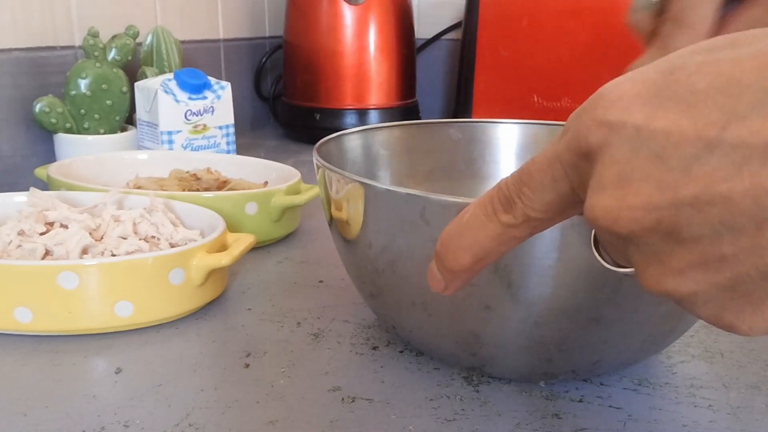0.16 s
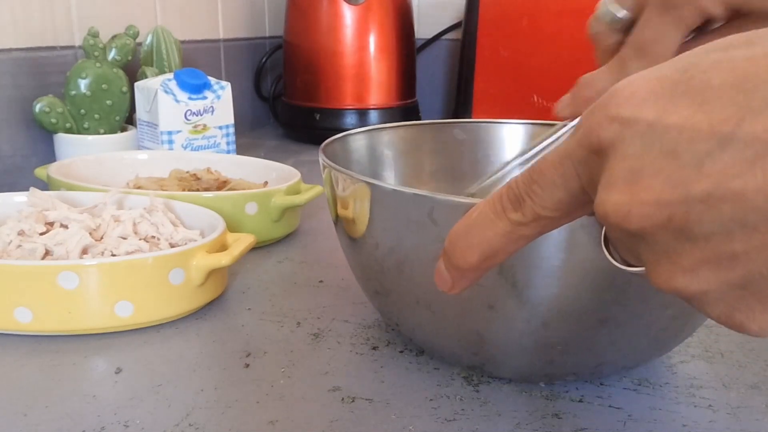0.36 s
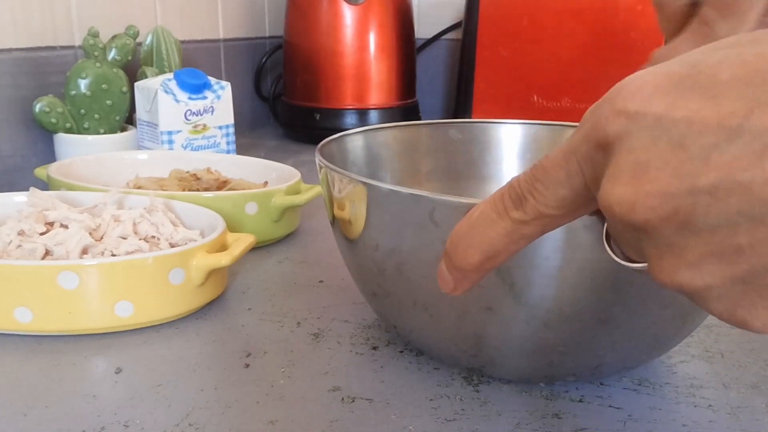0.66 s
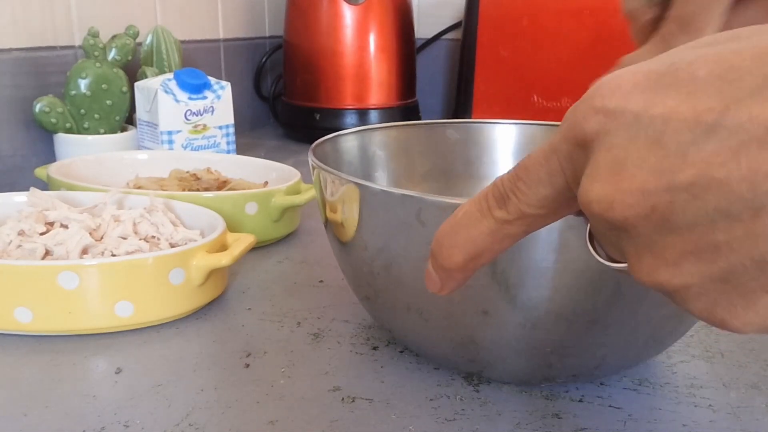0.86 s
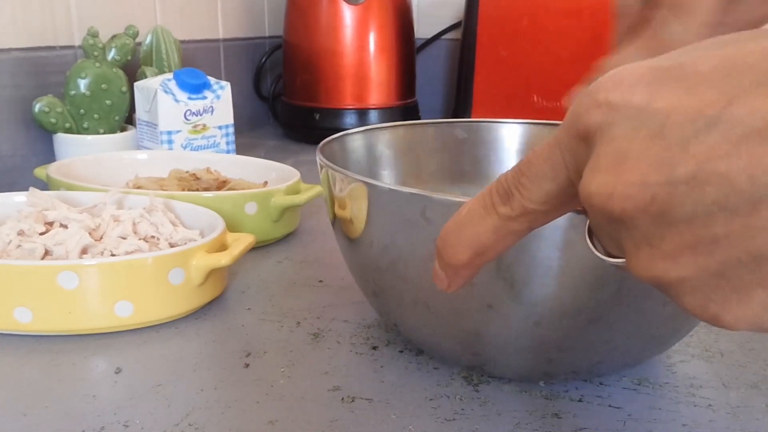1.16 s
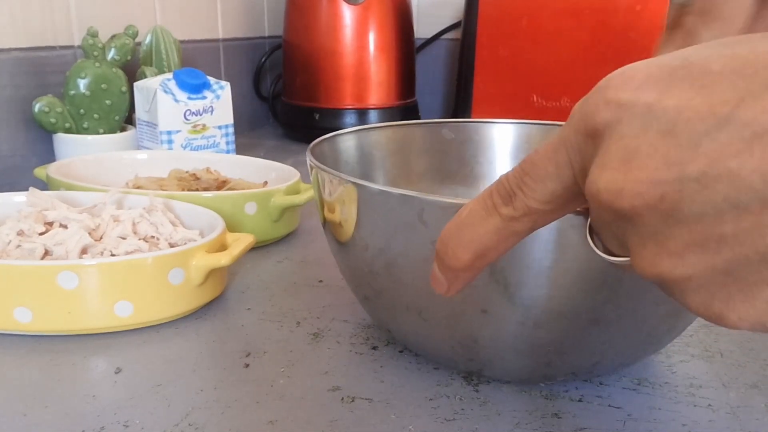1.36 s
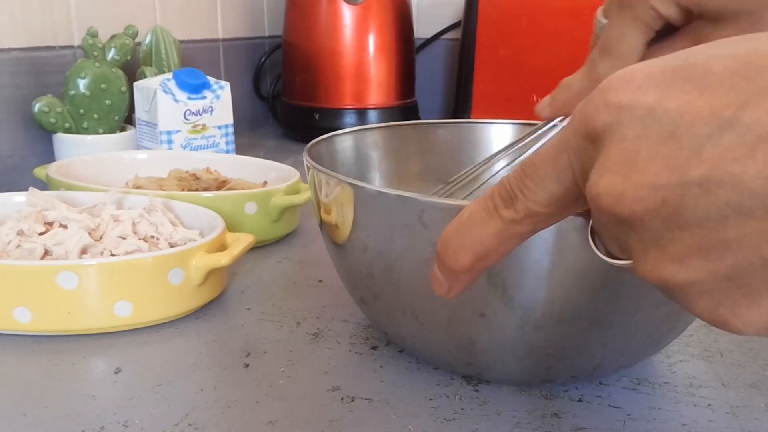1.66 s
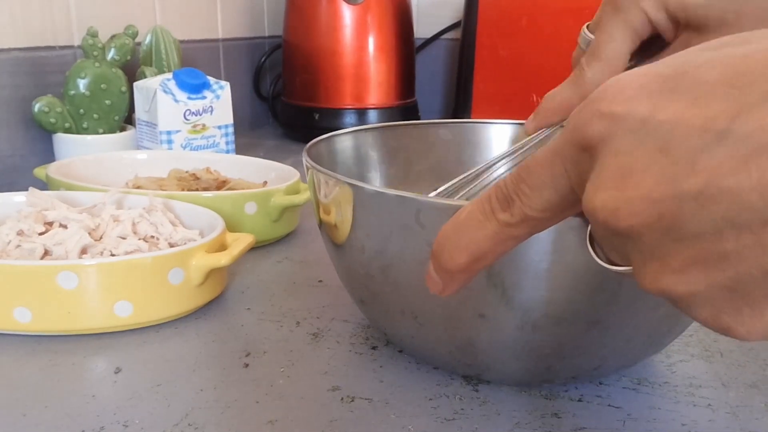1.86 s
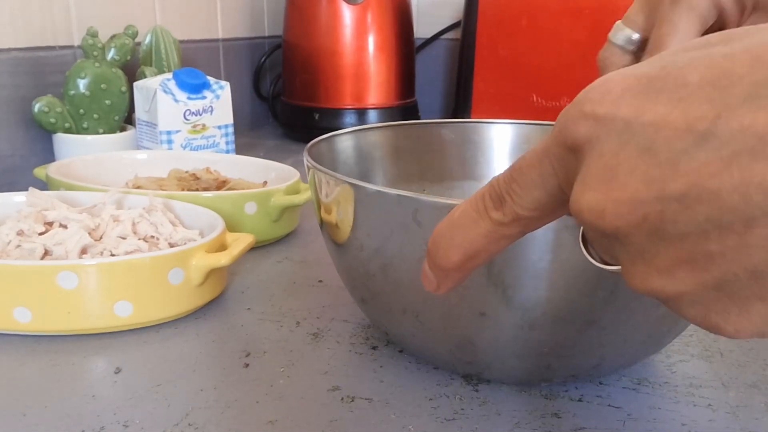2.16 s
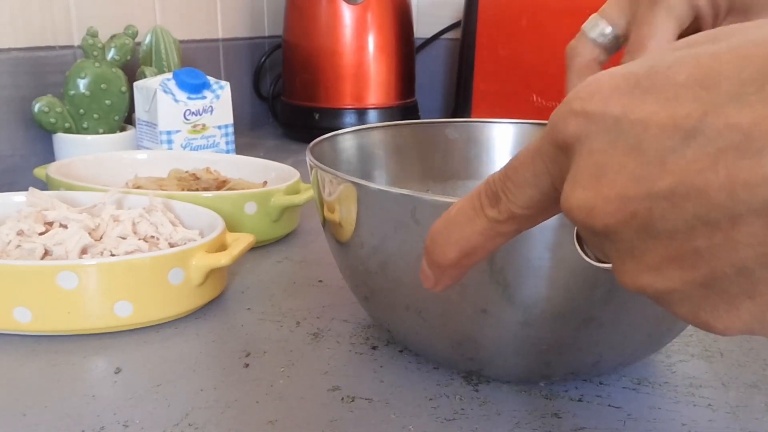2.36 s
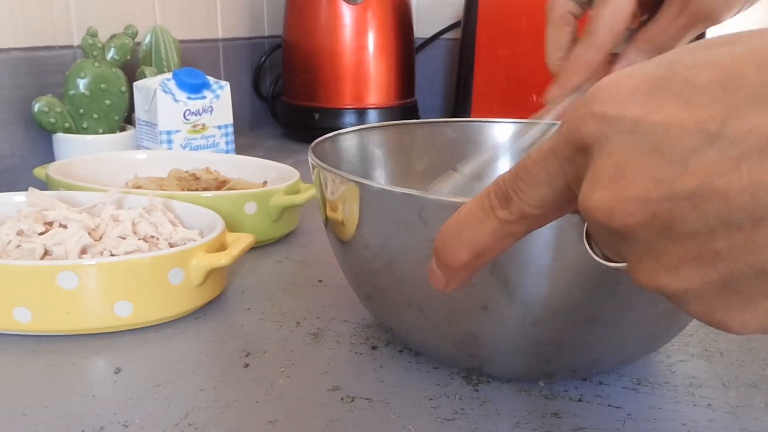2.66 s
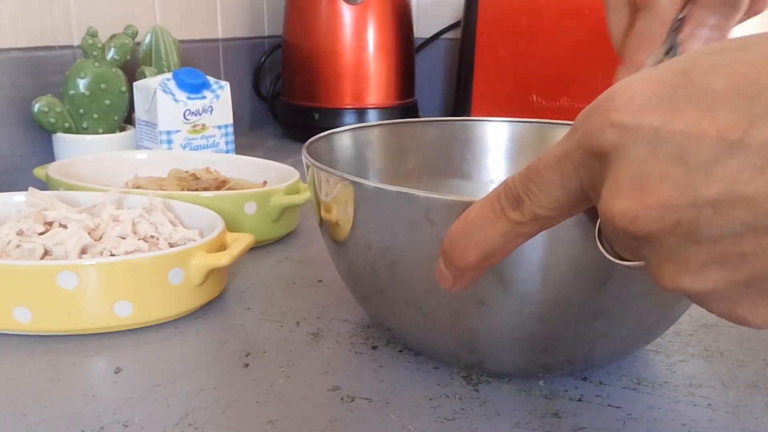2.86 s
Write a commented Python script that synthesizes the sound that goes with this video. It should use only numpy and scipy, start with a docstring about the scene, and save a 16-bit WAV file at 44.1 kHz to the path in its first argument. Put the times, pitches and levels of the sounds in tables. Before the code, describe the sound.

A wire whisk beats eggs briskly in a steel bowl, ticking, sloshing, ending in harder clanks

```python
"""A wire whisk beats eggs in a steel bowl on a kitchen counter, nearly five strokes a second, heard close.
The wires chatter, tick and squeak on the wall: noise bursts, filtered clicks and wavering sines.
Egg slaps ring the bowl's modes; flow through the wires is flickering noise, popping films and bubble pings.
The last four strokes hit bare steel much harder; a small kitchen rings briefly behind, over quiet air.
The stereo microphone feed has its deep bass cut, its peaks limited and its top cut steeply."""
import sys
import numpy as np
from scipy import signal
from scipy.fft import rfft, irfft, next_fast_len
from scipy.io import wavfile
from scipy.ndimage import uniform_filter1d, minimum_filter1d

SR = 44100
rng = np.random.default_rng(int(sys.argv[2]) if len(sys.argv) > 2 else 0)


def to_wav(sig):
    """Store sig (one row per channel, or 1-D mono) as 16-bit WAV at the path in sys.argv[1].

    Samples outside -1..1 are clipped; the rate is SR.
    """
    pcm = np.clip(np.atleast_2d(sig), -1, 1) * 32767
    pcm = np.round(pcm).astype(np.int16)
    wavfile.write(sys.argv[1], SR, pcm.T)  # frames by channels


N = 132300

# Wires chattering on the bowl: start_s, level_db, hold_s, pitch_hz, resonance_db
WIRE_CONTACTS = [(0.2418, -28.5, 0.005, 6370, -3), (0.2498, -21, 0.002, 6440, 1),
                 (0.49, -26, 0.0049, 5030, 9.5), (0.557, -31.5, 0.0023, 5130, 8),
                 (0.739, -26, 0.0048, 5400, 9), (0.781, -33, 0.0019, 4700, 5),
                 (0.818, -32, 0.0057, 4300, 11), (0.857, -30.5, .0015, 5470, 15),
                 (0.958, -25, 0.005, 4570, 10.5), (1.178, -25, 0.0013, 5270, 10),
                 (1.1815, -20.5, 0.0048, 4630, 12), (1.3996, -18, 0.001, 5400, 10.5),
                 (1.62, -28, 0.0091, 4330, 10.5), (1.818, -28.5, 0.0016, 5900, 22),
                 (1.905, -33, 0.0026, 5430, -10), (1.944, -20, 0.0016, 3580, 24),
                 (1.953, -29, 0.00092, 2340, 22), (2.132, -36.5, 0.0023, 3350, 7),
                 (2.269, -34.5, 0.0039, 4800, 12), (2.3374, -19.5, 0.002, 5350, 34.5),
                 (2.340, -13.5, 0.00099, 6950, 28), (2.351, -24, 0.02, 6800, 0.5),
                 (2.544, -24, 0.0036, 8500, 14), (2.55, -25.5, 0.0039, 7500, 0),
                 (2.559, -27.5, 0.006, 5670, -16.5), (2.67, -36, 0.008, 5100, 17),
                 (2.738, -14.5, 0.013, 7800, 10), (2.7427, -11, 0.0008, 6760, 14.5),
                 (2.747, -19.5, 0.01, 6550, 11), (2.868, -32, 0.0052, 6800, 3.5),
                 (2.958, -10.5, 0.0018, 6100, 14.5), (2.963, -11.5, 0.0027, 6430, 15),
                 (2.964, -18, 0.0039, 5500, 27), (2.971, -27.5, 0.029, 5400, 28)]
# Single wires ticking on the wall: start_s, peak_db
WIRE_SNAPS = [(0.247, -17), (0.2492, -8), (0.4945, -16), (.7392, -10), (0.7782, -13), (0.82, -16.5),
              (0.859, -20), (0.9565, -7.5), (1.178, -12), (1.24, -18), (1.264, -18), (1.325, -21),
              (1.3992, -10.5), (1.62, -7), (1.8171, -13.5), (1.837, -31), (1.903, -15.5), (1.946, -11.5),
              (2.959, -4.5)]
# Egg slapping the wall: start_s, level_db, hold_s, pitch_hz, bowl_ring_db
EGG_SLAPS = [(0.113, -54, 0.029, 487, -64), (0.244, -42, 0.017, 615, -44.5),
             (0.359, -51.5, 0.012, 915, -51), (0.491, -39, 0.0082, 603, -56),
             (0.609, -48, 0.015, 402, -51.5), (0.7355, -31.5, 0.0084, 2030, -43),
             (0.819, -36, 0.015, 1090, -42.5), (0.957, -39.5, 0.015, 593, -52),
             (1.045, -40.5, 0.0057, 920, -65), (1.178, -34.5, 0.014, 1160, -54),
             (1.265, -34.5, 0.011, 1180, -45), (1.399, -33, 0.0077, 1230, -44.5),
             (1.45, -43, 0.016, 1100, -44.5), (1.621, -36, 0.018, 580, -48),
             (1.817, -33, 0.0038, 910, -42.5), (1.952, -36, 0.0033, 1320, -48),
             (2.15, -42, 0.0052, 686, -51), (2.36, -22, 0.01, 1160, -35),
             (2.564, -23.5, 0.0023, 790, -39.5), (2.741, -31, 0.0087, 1880, -37.5),
             (2.955, -31, 0.011, 2220, -43.5)]
# High ringing of rim and wires: pitch_hz, resonance_db, t60_s
STEEL_MODES = [(2570, 7, 0.32), (2865, 11.5, 0.06), (3040, 12, 0.12), (5200, -6, 0.11), (5670, -2, 0.087),
               (6350, 5, 0.15), (6300, -20, 0.12), (6840, 10, 0.013), (6970, 1, 0.042), (7100, 8, 0.11),
               (8700, 11, 0.26), (7660, -7, 0.12), (9500, 7, 0.054)]
# Low modes of the bare bowl wall: pitch_hz, level_db, t60_s
WALL_MODES = [(243.6, -13.5, 0.14), (365, -14, .14), (437, -6.5, 0.16), (487, -6.5, 0.13),
              (768.3, -8, 0.22), (856, -3, 0.15), (1144, -11, .17), (1452, -3, 0.19), (1573, -7, 0.2),
              (1672, -4.5, 0.09), (1970, -15.5, 0.13), (2196, 1, 0.13)]
# Wires squeaking on wet steel: start_s, level_db, length_s, pitch_hz
WIRE_SQUEAKS = [(0.051, -40.5, 0.024, 2486), (0.147, -39.5, 0.048, 2490), (0.398, -40.5, .028, 3200),
                (.549, -30.5, 0.015, 4600), (.601, -33.5, 0.015, 3550), (0.916, -34, 0.012, 2770)]
# Wires sweeping through the egg: fastest_s, level_db, rise_s, fall_s, treble_tilt_db_per_octave
EGG_SWISHES = [(.08, -36.5, 0.039, 0.083, 4.5), (0.351, -36, 0.084, 0.062, 4.5),
               (.485, -37.5, 0.025, 0.02, 2), (.56, -37, 0.033, 0.045, 4), (.73, -35.5, 0.034, 0.024, 5),
               (.835, -38, 0.029, 0.031, 2.5), (.96, -34, 0.035, 0.032, 3), (1.055, -32.5, 0.014, 0.025, 2),
               (1.195, -34, 0.064, 0.012, 2.5), (1.29, -38, 0.029, 0.22, 3), (1.48, -32.5, 0.031, 0.037, 3),
               (1.62, -34.5, 0.034, 0.065, 3), (1.70, -33.5, 0.019, 0.023, 2.5),
               (1.80, -37, 0.043, 0.12, 2), (1.98, -38.5, 0.027, 0.046, -0.5),
               (2.228, -32.5, 0.019, 0.0057, 5), (2.26, -44, 0.078, 0.029, 0.5),
               (2.41, -31.5, 0.037, 0.028, 4), (2.61, -34.5, 0.049, 0.022, 2),
               (2.788, -32.5, 0.039, 0.031, 1.5), (2.967, -22.5, 0.0028, 0.0087, 2.5)]
# Colour of a wire's impact: frequency_hz, gain_db
WIRE_COLOUR = [(30, -54), (150, -23), (500, -10), (1500, -5.5), (3000, 2.5), (5000, 0.5), (8500, 2.5),
               (10500, -6.5), (12500, -12.5), (16000, -29)]
# Colour of an egg slap: frequency_hz, gain_db
EGG_COLOUR = [(35, -51.5), (110, -10.5), (150, -4), (300, -1), (450, -1), (670, -3.5), (1200, 0),
              (2500, 4.5), (5000, 3.5), (12000, -27)]
# Colour of froth and popping films: frequency_hz, gain_db
FROTH_COLOUR = [(25, -29), (80, -29), (250, -22), (700, -9), (1500, -1), (2500, 5), (4300, 5.5),
                (6500, 2.5), (8500, 0.5), (9400, -6.5), (12000, -17), (15500, -32.5)]
# Colour of the room air: frequency_hz, gain_db
AIR_COLOUR = [(25, -19), (55, -8), (80, 7), (110, 2), (180, 9.5), (500, 9.5), (2500, 17.5), (4500, 15.5),
              (8500, -29), (12000, -2), (16000, -23)]
# Colour of the kitchen's reflections: frequency_hz, gain_db
ROOM_COLOUR = [(60, 13), (250, 6.5), (1000, 6), (3000, 2), (8000, 1.5), (11000, 1.5), (16000, -42)]
# Filter on the left-right difference: frequency_hz, gain_db
SIDE_COLOUR = [(60, -27), (250, -31), (1300, -35.5), (2500, -47), (4400, -15), (8000, -8), (15000, -3)]

# Decays in s are to 1/e of the amplitude; widths are in octaves; "rough" is unevenness of strength.
WIRE_DECAY_S, WIRE_ROUGH, WIRE_WIDTH_OCT = 0.0024, 0.26, 0.89
NARROWING_DB = 18  # a wire resonance this much stronger is narrower by a factor e
SNAP_HZ, SNAP_RESONANCE_DB, SNAP_WIDTH_OCT = 4680, 11.5, 0.71
SLAP_DECAY_S, SLAP_ROUGH, SLAP_WIDTH_OCT, SLAP_RESONANCE_DB = 0.0015, 0.63, 0.67, 8.5
BARE_FROM_S = 2.3  # until then a film of egg damps the steel
RING_DB, WET_RING_DB = -6, -15  # the second is added while wet
WET_T60_SHARE, WET_DETUNE, BARE_DETUNE, PLACE_SPREAD_DB = 0.75, 0.045, 0.008, 4
SQUEAK_WAVER, SQUEAK_WAVER_PER_S = 0.024, 900  # pitch fraction per unit of drift
STIR_DB = -52.5  # flow that remains between swishes
FROTH_DB, FROTH_ROUGH = -5, 0.21
FLICKER_DB, FLICKER_PER_S = 3, 70  # level per unit of drift
POPS_PER_S, POP_DB, POP_SPREAD_DB, POP_DECAY_S = 90, -4, 18.5, 0.00041
# Levels of the weakest bubbles, relative to the flow; cycles to 1/e
BUBBLES_PER_S, BUBBLE_DB, BUBBLE_CYCLES, BUBBLE_LOW_HZ, BUBBLE_HIGH_HZ = 77, -19, 9.1, 1860, 5720
GLUGS_PER_S, GLUG_DB, GLUG_CYCLES, GLUG_LOW_HZ, GLUG_HIGH_HZ = 51, -35.5, 5.1, 396, 1540
BUBBLE_GLIDE = 0.016  # largest rise as a fraction of the pitch
AIR_DB = -52.5
ROOM_T60_S, ROOM_DB, SIDE_ROOM_DB = 0.31, -11.5, 0
SIDE_SCATTER_DB, SCATTER_DELAY_S, SCATTER_DECAY_S = -1, 0.0015, 0.00075
EGG_WIDTH_DB = -2.5  # the egg's share of the scatter
WHIRL_PER_S, WHIRL_RAD = 14, 1  # side phase, per unit of drift
LOW_CUT_HZ, TOP_HZ, CEILING = 70, 16000, 0.98


def undb(db):
    """Decibels to gain."""
    return 10 ** (np.asarray(db) / 20)


def unit(x):
    """Scale to rms 1."""
    return x / np.sqrt(np.mean(x ** 2))


def colour(x, points, hz=1000, peak_db=0, octaves=1):
    """Minimum-phase filter through (Hz, dB) points, with an optional broad resonance."""
    n = 2 * next_fast_len(len(x))
    log_hz = np.log2(np.maximum(np.fft.rfftfreq(n, 1 / SR), 1))
    p = np.array(points, float)
    db = np.interp(log_hz, np.log2(p[:, 0]), p[:, 1])
    db = db + peak_db * np.exp(-.5 * ((log_hz - np.log2(hz)) / octaves) ** 2)
    # Folding the cepstrum onto positive time makes the filter causal.
    cepstrum = irfft(np.log(undb(db)))
    cepstrum[1:n // 2] *= 2
    cepstrum[n // 2 + 1:] = 0
    return irfft(rfft(x, n) * np.exp(rfft(cepstrum)))[:len(x)]


def add(track, s, x):
    """Mix a sound in at time s."""
    i = int(np.clip(s * SR, 0, N - 1))
    track[i:i + len(x)] += x[:N - i]


def walk(rate):
    """Random drift through rate points a second, joined by straight lines, rms about 1.26."""
    return 1.54 * np.interp(np.arange(N) / SR * rate, np.arange(N), rng.standard_normal(N))


def grains(rough, size, count=12):
    """Noise whose strength jumps every count samples, like dense uneven impacts."""
    strength = np.repeat(rng.standard_normal(size // count + 1), count)[:size]
    return unit(rng.standard_normal(size) * np.exp(rough * strength))


def burst(db, hold, decay, rough, points, hz, peak_db, octaves):
    """A cluster of impacts that starts at once, holds and dies away."""
    x = grains(rough, size=4096)
    t = np.arange(len(x)) / SR
    envelope = np.exp(-np.maximum(t - hold, 0) / decay)
    x = colour(x * envelope, points, hz, peak_db, octaves)
    energy = (hold + decay / 2) * SR
    return x * undb(db) * np.sqrt(energy / np.sum(x ** 2))


def wires():
    """The wires chatter on the wall in noise bursts, mostly a few milliseconds long."""
    out = np.zeros(N)
    for s, db, hold, hz, peak_db in WIRE_CONTACTS:
        width = WIRE_WIDTH_OCT * np.exp(-peak_db / NARROWING_DB)
        add(out, s, burst(db, hold, WIRE_DECAY_S, WIRE_ROUGH, WIRE_COLOUR, hz, peak_db, width))
    return out


def snaps():
    """A single wire that meets the wall head-on gives one sharp tick, a filtered click."""
    out = np.zeros(N)
    click = signal.unit_impulse(1024)
    tick = colour(click, WIRE_COLOUR, SNAP_HZ, SNAP_RESONANCE_DB, SNAP_WIDTH_OCT)
    for s, db in WIRE_SNAPS:
        add(out, s, undb(db) * tick / abs(tick).max())
    return out


def slaps():
    """Egg thrown against the wall lands with a short wet splat of noise."""
    out = np.zeros(N)
    for s, db, hold, hz, _ in EGG_SLAPS:
        add(out, s, burst(db, hold, SLAP_DECAY_S, SLAP_ROUGH, EGG_COLOUR, hz,
                          SLAP_RESONANCE_DB, SLAP_WIDTH_OCT))
    return out


def bowl(blows):
    """Every blow excites the decaying high modes of the steel, louder once the wall is bare."""
    ring, t = 0, np.arange(SR // 2) / SR
    for hz, db, t60 in STEEL_MODES:
        damping = np.log(1000) / t60
        level = undb(db) * 2 * damping / SR  # sets the gain at resonance, whatever the decay
        ring = ring + level * np.exp(-damping * t) * np.cos(2 * np.pi * hz * t)
    wet = np.arange(N) / SR < BARE_FROM_S
    drive = blows * undb(RING_DB + WET_RING_DB * wet)
    return blows + signal.fftconvolve(drive, ring)[:N]


def body():
    """Slaps knock the low wall modes; place struck alters their mix, clinging egg damps and detunes them."""
    out, t = np.zeros(N), np.arange(SR // 2) / SR
    hz, mode_db, t60 = np.array(WALL_MODES, float).T[:, :, None]
    for s, _, _, _, ring_db in EGG_SLAPS:
        place, side, load = np.clip(rng.standard_normal((3, len(WALL_MODES), 1)), -1.5, 1.5)
        life, detune = t60, BARE_DETUNE
        if s < BARE_FROM_S:
            life, detune = t60 * WET_T60_SHARE, WET_DETUNE
        tones = np.sign(side) * np.sin(2 * np.pi * hz * (1 + detune * load) * t)
        modes = tones * np.exp(-np.log(1000) * t / life)
        levels = undb(ring_db + mode_db + PLACE_SPREAD_DB * place)
        add(out, s, np.sum(modes * levels, axis=0))
    return out


def squeaks():
    """A wire sliding on wet steel chirps briefly, a sine of unsteady pitch."""
    out = np.zeros(N)
    for s, db, length, hz in WIRE_SQUEAKS:
        swell = np.sin(np.linspace(0, np.pi, int(length * SR)))
        pitch = hz * (1 + SQUEAK_WAVER * walk(SQUEAK_WAVER_PER_S)[:len(swell)])
        add(out, s, undb(db) * swell * np.sin(2 * np.pi * np.cumsum(pitch) / SR))
    return out


def sweep():
    """Strength and treble tilt of the flow through the wires, swelling with every pass."""
    t = np.arange(N) / SR
    power, tilt = np.full(N, undb(STIR_DB) ** 2), 0
    for s, db, rise, fall, tilt_db in EGG_SWISHES:
        shape = np.exp(-.5 * ((t - s) / np.where(t < s, rise, fall)) ** 2)
        swell = (undb(db) * shape) ** 2
        power = power + swell
        tilt = tilt + tilt_db * swell
    return np.sqrt(power), tilt / power  # the strongest pass dominates the tilt


def froth(flow, tilt):
    """The torn liquid crackles finely; each half octave of noise flickers as the films break."""
    fizz = rfft(unit(colour(grains(FROTH_ROUGH, size=N, count=64), FROTH_COLOUR)))
    octave = np.log2(np.clip(np.fft.rfftfreq(N, 1 / SR), 250, 16000) / 4000)
    out = 0
    for centre in np.arange(-4, 2.1, .5):  # octaves from 4 kHz
        band = irfft(fizz * np.maximum(1 - 2 * abs(octave - centre), 0), N)
        out = out + band * undb(FLICKER_DB * walk(FLICKER_PER_S) + tilt * max(centre, -1))
    return out * flow * undb(FROTH_DB)


def pops(flow, size=256):
    """Films of egg snap between the wires in scattered wet ticks of decaying noise."""
    out, t = np.zeros(N), np.arange(size) / SR
    for when, strength in rng.random((int(POPS_PER_S * N / SR), 2)):
        tick = rng.uniform(-1, 1, size) * np.exp(-t / POP_DECAY_S)
        add(out, when * N / SR, tick * undb(POP_SPREAD_DB * strength ** 2))
    return undb(POP_DB) * 2 * colour(out, FROTH_COLOUR) * flow


def bubbles(flow, per_s, db, cycles, low_hz, high_hz, size=3000):
    """Trapped air rings for a few cycles, rising in pitch; louder when the flow is strong."""
    out, t = np.zeros(N), np.arange(size) / SR
    for when, pitch, strength in rng.random((int(per_s * N / SR), 3)):
        hz = low_hz * (high_hz / low_hz) ** pitch
        age = t * hz / cycles
        rising_hz = hz * (1 + BUBBLE_GLIDE * (1 - np.exp(-age / 2)))
        ping = np.sin(2 * np.pi * np.cumsum(rising_hz) / SR) * np.exp(-age)
        add(out, when * N / SR, ping * flow[int(when * N)] * undb(db + 20 * strength ** 2))
    return out


def room_air():
    """Quiet steady air in the kitchen: coloured noise."""
    return undb(AIR_DB) * unit(colour(rng.standard_normal(N), AIR_COLOUR))


def kitchen(x, scattered):
    """A short room tail; treble scatters off the bowl to each side, its phase turned by the moving whisk."""
    t = np.arange(SR // 2) / SR
    room_decay = undb(-60 * t / ROOM_T60_S)
    decays = np.array([room_decay, room_decay, np.exp(-t / SCATTER_DECAY_S)])
    tails = rng.standard_normal((3, len(t))) * decays
    tails *= t > SCATTER_DELAY_S
    tails /= np.sqrt(np.sum(tails ** 2, axis=1, keepdims=True))
    wet = undb(ROOM_DB) * colour(x, ROOM_COLOUR)
    mid = x + signal.fftconvolve(wet, tails[0])[:N]
    side_room = undb(SIDE_ROOM_DB) * signal.fftconvolve(wet, tails[1])[:N]
    side_scatter = undb(SIDE_SCATTER_DB) * signal.fftconvolve(scattered, tails[2])[:N]
    side = colour(side_room + side_scatter, SIDE_COLOUR)
    side = np.real(signal.hilbert(side) * np.exp(1j * WHIRL_RAD * walk(WHIRL_PER_S)))
    return np.array([mid + side, mid - side])


def scene():
    """Whisk, egg and quiet air together in the kitchen."""
    blows = bowl(wires() + snaps() + slaps()) + body()
    flow, tilt = sweep()
    egg = squeaks() + froth(flow, tilt) + pops(flow)
    egg = egg + bubbles(flow, BUBBLES_PER_S, BUBBLE_DB, BUBBLE_CYCLES, BUBBLE_LOW_HZ, BUBBLE_HIGH_HZ)
    egg = egg + bubbles(flow, GLUGS_PER_S, GLUG_DB, GLUG_CYCLES, GLUG_LOW_HZ, GLUG_HIGH_HZ)
    air = room_air()
    return kitchen(blows + egg + air, blows + undb(EGG_WIDTH_DB) * egg + air)


def record(dry):
    """The microphone drops deep bass, a quick limiter holds the hardest peaks, the top is cut steeply."""
    low_cut = signal.butter(2, LOW_CUT_HZ, "high", fs=SR, output="sos")
    x = signal.sosfilt(low_cut, dry)
    need = CEILING / np.maximum(abs(x).max(axis=0), CEILING)
    gain = uniform_filter1d(minimum_filter1d(need, size=129), size=129)  # one gain for both sides
    top_cut = signal.ellip(8, .2, 70, TOP_HZ, fs=SR, output="sos")
    return signal.sosfilt(top_cut, x * gain)


dry = scene()
out = record(dry)
to_wav(out)
```